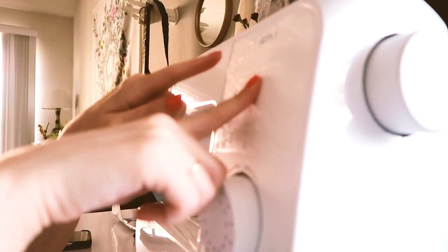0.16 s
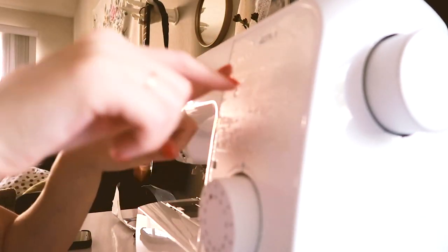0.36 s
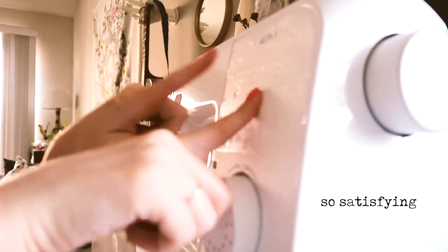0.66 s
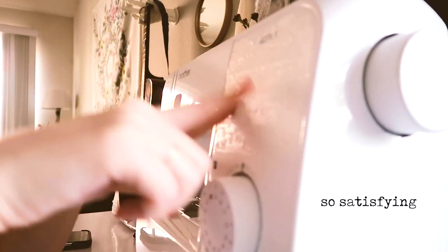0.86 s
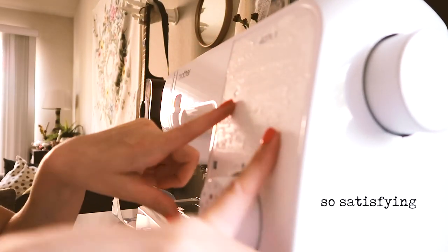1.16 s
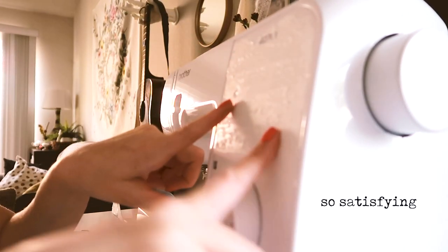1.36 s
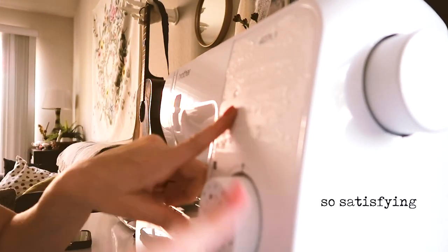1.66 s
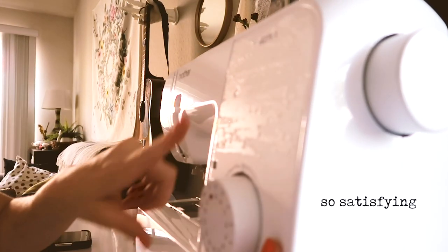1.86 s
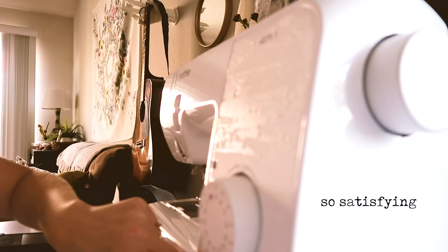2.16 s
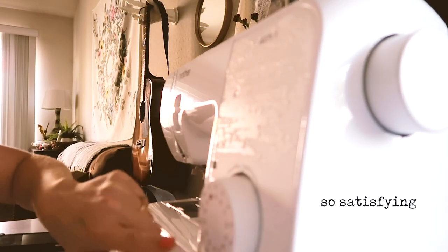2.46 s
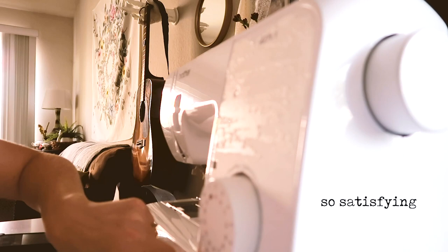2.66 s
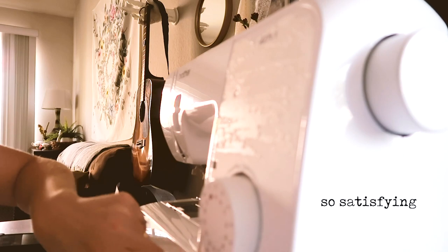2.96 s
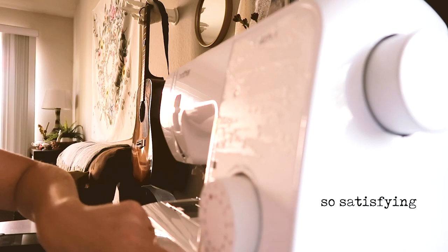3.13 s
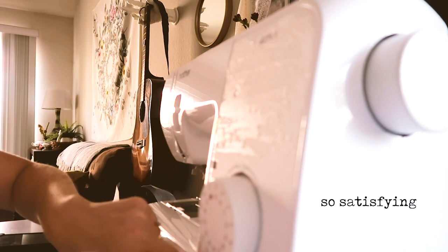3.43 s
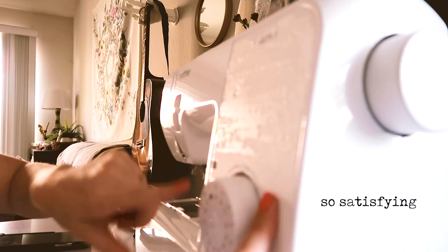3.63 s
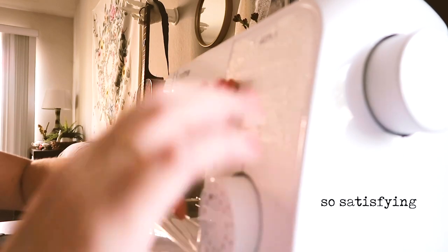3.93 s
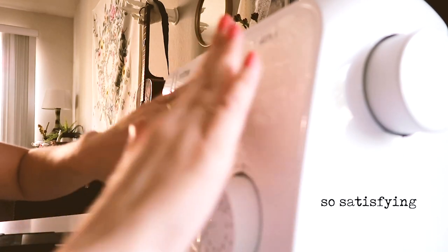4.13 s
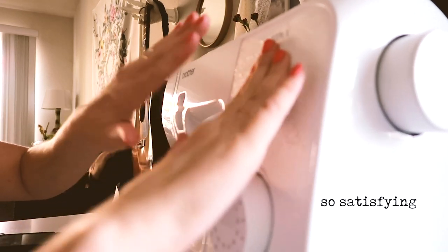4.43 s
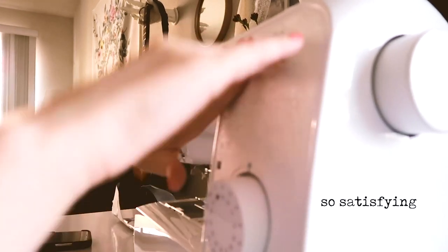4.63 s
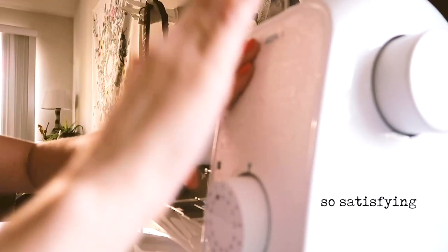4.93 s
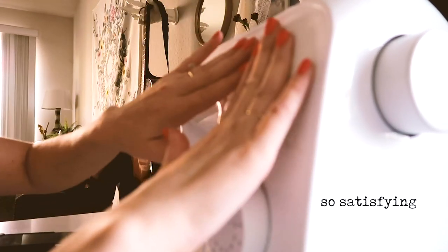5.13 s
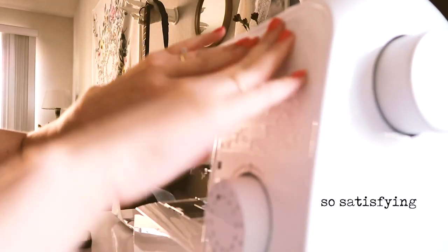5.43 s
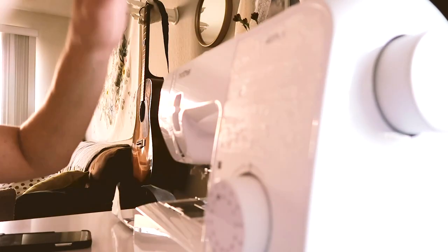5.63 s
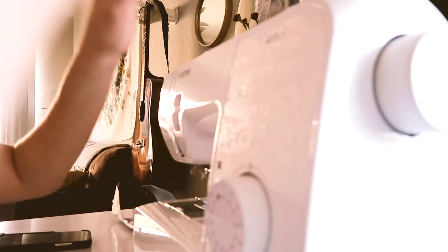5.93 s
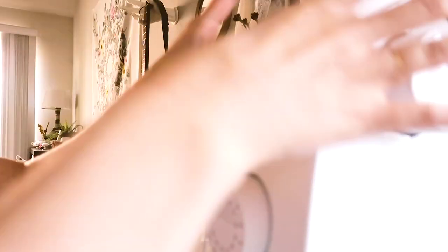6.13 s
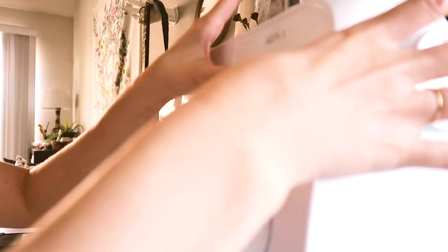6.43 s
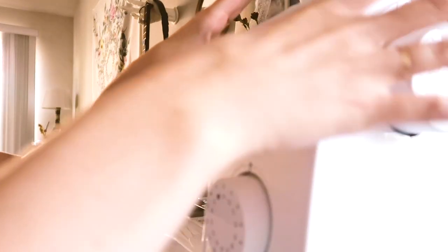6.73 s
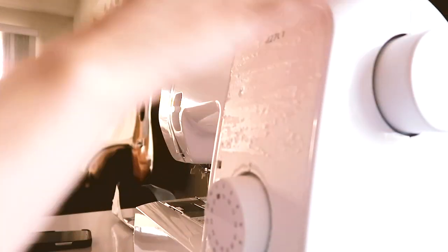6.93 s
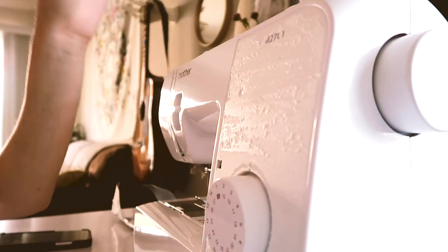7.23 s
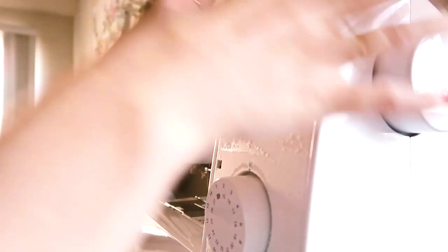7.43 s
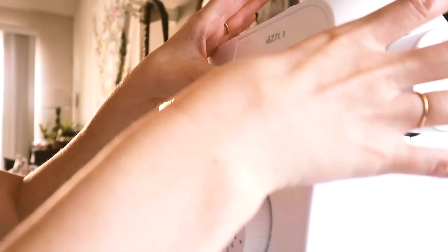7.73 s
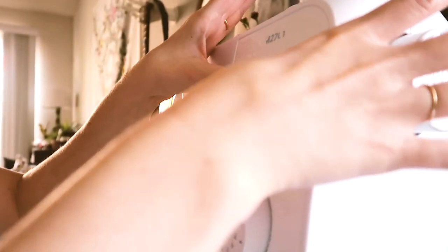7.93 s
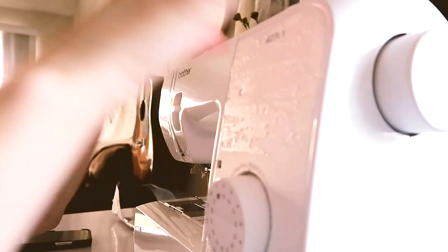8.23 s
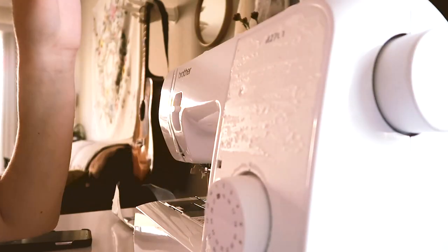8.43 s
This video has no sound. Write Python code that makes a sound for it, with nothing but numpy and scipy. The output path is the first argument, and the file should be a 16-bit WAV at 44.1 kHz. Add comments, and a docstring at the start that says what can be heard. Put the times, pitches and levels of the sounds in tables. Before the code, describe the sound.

Very close to the microphone, fingertips tack onto sticky glue on a thin hollow plastic machine casing and pull free. Each release gives a brief crackle, then a dull boxy pop with a crisp snap. Deeper pops follow in the middle, then flurries of hand slaps with a heavy rumble, then sparse sticky peels. Small furnished room, soft low hum, short echo.

```python
"""In a small furnished room with a faint hum, fingertips press onto tacky glue on the hollow plastic casing
of a sewing machine and pull off again, close to the microphone; later whole hands slap and peel.
Pulls crackle as random streams of breaking glue threads, then pop with a damped panel boom and noise bursts.
Casing modes colour the touches, gliding sines make squeaks and soft ringing tones, and filtered noise makes
rumbles and room air."""
import sys
import numpy as np
from scipy import signal
from scipy.fft import rfft, irfft
from scipy.io import wavfile
from scipy.ndimage import uniform_filter1d

SR = 44100
rng = np.random.default_rng(int(sys.argv[2]) if len(sys.argv) > 2 else 0)


def unload_audio(sound):
    """Save the sound as a 16-bit wav file, at the path given as the first command line argument."""
    columns = np.transpose(np.atleast_2d(sound))
    # keep every value between -1 and 1, then stretch to whole-number steps
    steps = np.round(np.clip(columns, -1, 1) * 32767)
    wavfile.write(sys.argv[1], SR, steps.astype(np.int16))


N = 378378


def amp(db):
    """Decibels to gain."""
    return 10 ** (np.asarray(db) / 20)


def read(points, hz):
    """Reads a frequency table on a log-frequency axis."""
    f, value = np.transpose(points)
    return np.interp(np.log(hz + 1), np.log(f + 1), value)


def evened(x, size=None):
    """Scales to rms 1 over the first size samples."""
    return x / np.sqrt(np.mean(x[:size] ** 2) + 1e-20)


def steady(x):
    """Holds the running rms near 1 and leaves the fine grain."""
    return x / np.sqrt(abs(uniform_filter1d(x ** 2, size=1100)) + 1e-9)


def add(mix, s, sound):
    """Mixes a sound in at time s."""
    part = mix[max(round(s * SR), 0):][:len(sound)]
    part += sound[:len(part)]


def colour(points, size=1024):
    """Causal (minimum-phase) impulse response with the given spectrum."""
    log_gain = np.log(amp(read(points, abs(np.fft.fftfreq(size, 1 / SR)))))
    return np.fft.ifft(np.exp(np.conj(signal.hilbert(log_gain)))).real[:size // 2]


def through(x, response):
    """Convolves and keeps the length."""
    return signal.fftconvolve(x, response)[:len(x)]


def resonate(x, bands):
    """Sums resonances given as (frequency [Hz], width [Hz], level [dB])."""
    return sum(amp(db) * signal.lfilter(*signal.iirpeak(hz, hz / width, fs=SR), x) for hz, width, db in bands)


def even_noise(size):
    """Noise with a flat spectrum and random phase."""
    return irfft(np.exp(2j * np.pi * rng.random(size // 2 + 1)), size) * np.sqrt(size)


def background(air_db=-53, waver=0.43):
    """Room air as shaped noise, with a phase-wavering mains hum and a thin electronic whine."""
    # spectrum of the air in the room: (frequency [Hz], relative level [dB])
    air_spectrum = [(10, -31), (24, 2.5), (45, -5), (70, -10), (95, -10.5), (150, -13), (250, -13),
                    (400, -16), (550, -23), (800, -26.5), (1900, -31.5), (3000, -35), (7000, -44.5),
                    (12500, -55), (15500, -101)]
    # hum and whine: (frequency [Hz], rms level before the gain over time [dB])
    hum_tones = [(59.5, -71.5), (118.6, -60), (209.9, -64), (247.6, -62.5), (13006, -88)]
    # gain of the whole background: (time [s], level [dB])
    air_gain = [(0, 7), (2.6, 6), (2.9, 1), (3.85, 3), (4.3, 7), (8.58, 6)]
    hz, t = np.fft.rfftfreq(N, 1 / SR), np.arange(N) / SR
    mid, side = rfft(rng.standard_normal((2, N))) * amp(read(air_spectrum, hz))
    # the two channels share the low air noise more than the high
    side = side * amp(read([(60, -26.0), (300, -6.5), (1000, -3.0), (3000, -1), (8000, 2.0)], hz))
    mid, side = irfft(np.array([mid, side]), N)
    air = amp(air_db) * np.array([mid + side, mid - side]) / mid.std()
    knots = np.linspace(0, t[-1], 60)
    hum = np.zeros(N)
    for f, db in hum_tones:
        drift = waver * np.interp(t, knots, rng.standard_normal(len(knots)))  # radians
        hum += amp(db) * np.sqrt(2) * np.sin(2 * np.pi * f * t + drift)
    return (air + hum) * amp(np.interp(t, *np.transpose(air_gain)))


def ringing(t, high, spread_db=0., detune=0.):
    """Low modes of the whole shell, or high modes of the walls; share and pitch can vary from touch to touch."""
    # modes of the casing: (frequency [Hz], relative level [dB], t60 [s])
    casing_modes = [(142, -9.5, 0.32), (160, -9.5, 0.32), (221.2, -4.5, 0.23), (264.3, -16.5, 0.26),
                    (305, -0.5, 0.21), (400, -6.5, 0.24), (472.5, -4, 0.12), (522, -8, 0.15),
                    (573, -10.5, 0.068), (718, -19.5, 0.093), (868, -10, 0.14), (1026.4, -7.5, 0.11),
                    (1241.4, -7.5, 0.096), (1383, -7.5, 0.11), (1556, -6.5, 0.092), (1743, -9, 0.046),
                    (2172, -1.5, 0.061), (2418, -1, 0.045), (2700, 3, 0.016), (3497, 4.5, 0.023),
                    (4240, 2, 0.018)]
    out = np.zeros(len(t))
    for hz, db, t60 in casing_modes:
        if (hz > 550) == high:
            sign = rng.choice([-1, 1]) if high else 1
            share, shift = rng.standard_normal(2)
            level = amp(db + spread_db * share - 60 * t / t60)
            out += sign * level * np.sin(2 * np.pi * hz * (1 + detune * shift) * t)
    return out


def walls(t, contact, scatter_db=-19.5, scatter_t60=0.14, modes_db=-13.5, swell=0.089):
    """A short ragged contact, the dense ring of the thin plastic and its stronger modes."""
    burst = even_noise(len(t)) * (np.exp(-t / contact) + amp(scatter_db - 60 * t / scatter_t60))
    modes = evened(ringing(t, True, spread_db=2.5, detune=0.03), size=512)
    ring = evened(burst, size=512) + amp(modes_db) * modes
    return ring * (1 - np.exp(-t / (swell * contact)))


def pops(rise=0.0019, shell_db=-10.5, cancel_hz=167.0, lead_db=-12.0, lead=0.0049,
         sag=0.084, sag_time=0.016, crisp_hz=6560.0, crisp_gain=1.0):
    """The panel springs back with a damped boom and its overtone; the parting skin makes the clack and the snap."""
    # touches and releases: (time [s], boom [dB], clack [dB], snap [dB], middle boom pitch [Hz],
    # contact decay constant [s], boom t60 [s], middle overtone pitch [Hz], overtone [dB])
    touches = [(0.0518, -32, -49.5, -47, 355, 0.0051, 0.055, 666, -55),
               (0.4195, -13, -18, -20.5, 363, 0.0036, 0.071, 528, -24.5),
               (0.59, -30.5, -68, -70, 326, 0.0045, 0.064, 490, -57),
               (0.723, -13, -20.5, -22.5, 361, 0.0041, 0.05, 511, -23.5),
               (0.9896, -12, -18, -25, 346, 0.0062, 0.081, 510, -28),
               (1.354, -13, -27.5, -36, 332, 0.012, 0.039, 590, -27),
               (1.486, -38.5, -43.5, -40, 353, 0.011, 0.093, 600, -50),
               (1.533, -31, -31, -27, 343, 0.0046, 0.054, 586, -42),
               (1.5392, -19, -31.5, -34, 347, 0.0012, 0.057, 762, -35),
               (1.5545, -19.5, -30, -29, 327, 0.0015, 0.064, 624, -29.5),
               (1.878, -19, -20, -29.5, 338, 0.0027, 0.059, 630, -31),
               (2.2037, -10.5, -22.5, -38.5, 331, 0.0052, 0.06, 582, -27.5),
               (2.5116, -13.5, -24, -29.5, 337, 0.007, 0.049, 701, -24.5),
               (2.738, -6.5, -38, -58, 335, 0.0048, 0.096, 463, -30),
               (2.7507, -20, -21, -27.5, 327, 0.0019, .04, 500, -31),
               (2.7522, -8.5, -27.5, -27, 339, 0.0026, 0.043, 437, -34),
               (2.9664, -20.5, -32, -35, 333, 0.0063, 0.05, 722, -33.5),
               (3.1744, -8.5, -28, -29, 347, 0.0029, 0.056, 500, -40),
               (3.319, -28, -51.5, -60, 346, .019, 0.065, 505, -44.5),
               (3.497, -7.5, -21, -31.5, 343, 0.0026, 0.056, 487, -24.5),
               (3.6374, -16, -38, -44.5, 339, 0.00078, .055, 714, -36),
               (3.9724, -37, -41.5, -36.5, 383, 0.0064, 0.14, 636, -48),
               (4.053, -33, -50, -55, 341, 0.0087, 0.064, 610, -48),
               (4.333, -20, -28.5, -35, 355, 0.016, 0.05, 423, -31),
               (4.354, -21.5, -31, -54, 333, .012, 0.094, 590, -33),
               (4.368, -21, -50, -38.5, 341, 0.0048, 0.061, 548, -33),
               (4.436, -39, -37, -28.5, 370, 0.0033, 0.051, 600, -38.5),
               (4.667, -15, -27.5, -32, 305, 0.0013, 0.04, 503, -31),
               (4.673, -9.5, -28.5, -27.5, 330.5, 0.02, 0.044, 438, -36),
               (4.7483, -21, -28.5, -39, 384, 0.0072, 0.028, 681, -31),
               (4.8174, -23.5, -27.5, -31, 400, 0.003, 0.056, 615, -41),
               (4.8316, -19.5, -22.5, -22.5, 368, 0.0018, 0.066, 734, -31.5),
               (4.879, -48, -44, -33, 382, 0.0063, 0.076, 617, -44),
               (4.897, -34, -34, -45, 341, 0.0093, 0.077, 670, -43),
               (4.96, -35.5, -35.5, -46.5, 413, 0.0002, 0.04, 716, -54),
               (5.162, -18, -32.5, -35.5, 352, 0.0054, 0.072, 543, -29.5),
               (5.264, -51, -61, -46.5, 355, 0.00099, 0.051, 610, -51),
               (5.3, -22.5, -35, -38, 347, 0.017, 0.037, 800, -36.5),
               (5.316, -55, -37, -32, 377, 0.0015, .06, 598, -40),
               (5.491, -46, -50, -41, 373, 0.0015, .06, 595, -60),
               (5.5463, -29, -30.5, -37, 351, .001, 0.13, 770, -49),
               (5.609, -22, -48, -32, 360, 0.026, 0.082, 580, -30),
               (5.636, -40, -33, -27, 366, 0.0012, 0.07, 600, -37),
               (5.651, -22, -29.5, -27, 340, 0.0041, 0.048, 600, -53),
               (6.267, -28.5, -39, -44.5, 400, 0.014, 0.1, 629, -37),
               (6.286, -27.5, -41, -45.5, 347, .0077, 0.057, 756, -44),
               (6.906, -36, -37.5, -41, 384, 0.0022, 0.054, 484, -51),
               (7.029, -13.5, -19.5, -28.5, 355, 0.012, 0.074, 552, -23),
               (7.6095, -29, -36.5, -40.5, 380, 0.0032, 0.091, 684, -45),
               (7.641, -39, -34, -41, 320, 0.0077, 0.13, 647, -43),
               (7.654, -31, -52, -53, 285, 0.0055, 0.03, 575, -43),
               (8.295, -19.5, -25, -28.5, 398, 0.015, 0.029, 520, -31),
               (8.3139, -16, -24, -27.5, 348, 0.0074, 0.042, 575, -26)]
    # spectra of the clack and the snap: (frequency [Hz], relative level [dB])
    clack_spectrum = [(100, -50.5), (300, 3), (550, 6.5), (850, -0.5), (1250, 2), (2000, -10),
                      (3000, -46.5), (16000, -40)]
    snap_spectrum = [(300, -56.5), (1200, -1), (2200, 5.5), (3000, 1), (4000, -3.5), (5200, -10.5),
                     (10000, -17), (13500, -29), (16000, -35)]
    overtone_t60 = 0.089  # s, the panel's second mode
    out, t = np.zeros(N), np.arange(8192) / SR
    clack, snap = colour(clack_spectrum), colour(snap_spectrum)
    shell = amp(shell_db) * evened(ringing(t, False), size=512)
    radiation = signal.butter(2, cancel_hz, "high", fs=SR, output="sos")  # a small panel gives off little deep bass
    bent = np.cumsum(1 + sag * (np.exp(-t / sag_time) - .5)) / SR  # the pitch sinks as the strain leaves the panel
    for s, boom_db, clack_db, snap_db, hz, contact, t60, overtone_hz, overtone_db in touches:
        panel = evened(amp(-60 * t / t60) * np.sin(2 * np.pi * hz * bent), size=512)
        boom = signal.sosfilt(radiation, (panel + shell) * (1 - np.exp(-(t / rise) ** 2)))
        overtone = amp(-60 * t / overtone_t60) * np.sin(2 * np.pi * overtone_hz * bent)
        overtone = overtone * (1 - np.exp(-t / rise))
        # where the snap outweighs the clack the glue parts cleanly and sounds brighter
        edge = min(crisp_hz * amp(crisp_gain * (snap_db - clack_db)), SR * 2 / 5)
        crack = signal.lfilter(*signal.butter(1, edge, fs=SR), snap)
        clack_part = through(walls(t, contact), clack)
        snap_part = through(walls(t, contact), crack)
        parts = (boom_db, boom), (overtone_db, overtone), (clack_db, clack_part), (snap_db, snap_part)
        for db, part in parts:
            add(out, s, amp(db) * evened(part, size=512))
        # the rim of the contact tears with growing force just before the pop
        tearing = evened(through(even_noise(size=1024), crack)) * np.exp(-t[:1024] / lead)[::-1]
        add(out, s - len(tearing) / SR, amp(snap_db + lead_db) * tearing)
    return out


def peels(boom_t60=0.073):
    """Glue threads break in a dense stream, ticking the walls and shaking the panel until the skin lets go."""
    # peels: (start [s], end [s], crackle at the end [dB], boom at the end [dB],
    # swell of the crackle, negative where it fades [dB], panel pitch halfway [Hz])
    pulls = [(0.357, 0.421, -40.5, -21.5, -6, 365), (.682, 0.73, -60, -41, -8.5, 350),
             (0.928, 0.92, -50, -49, 16, 387), (0.961, 0.992, -36, -27.5, -0.5, 400),
             (1.261, 1.29, -49, -46, 1, 352), (1.526, 1.534, -32, -41, 8.5, 352),
             (1.817, 1.893, -45.5, -35, -1.5, 343), (2.438, 2.494, -43, -33, 8, 347),
             (2.634, 2.732, -38, -14.5, 8.5, 332), (2.899, 2.95, -55, -39, 1, 335),
             (3.105, 3.16, -46, -22.5, -2, 334), (3.44, 3.508, -44.5, -20.5, 3, 351),
             (3.95, 3.978, -39, -59, 13, 364), (4.254, 4.362, -35.5, -34.5, 12.5, 340),
             (4.557, 4.667, -42, -37, 4, 370), (4.736, 4.795, -40, -27, -8.5, 360),
             (5.038, 5.175, -49, -44, 0.5, 352), (5.51, 5.603, -31.5, -31, 7, 341),
             (5.632, 5.649, -24.5, -34, 1.5, 350), (6.926, 6.959, -39, -31.5, -1.5, 375),
             (6.995, 7.018, -26.5, -20.5, 2, 357), (7.625, 7.625, -39, -37, 10, 356),
             (8.196, 8.232, -41, -38, -2, 410), (8.255, 8.291, -31, -27.5, 8, 395)]
    # spectrum of the crackle: (frequency [Hz], relative level [dB])
    crackle_spectrum = [(100, -26.5), (300, -2.5), (550, 4.5), (850, 2), (1250, 1.5), (2000, 0),
                        (3000, -4.5), (4000, -10.5), (5200, -15.5), (7500, -21), (10000, -28),
                        (13500, -49.5)]
    # band where the finest threads tick: (low edge [Hz], high edge [Hz])
    sizzle_band = (12000, 15000)
    threads_per_s, thread_spread_db, clump_db = 2700., 3.4, 2.0
    sizzle_db, sizzle_growth = -41.5, 0.69  # sizzle at 0 dB of crackle, and its dB per dB of crackle
    attack_s, release_s, panel_stop_s = 0.014, 0.015, 0.13  # the glue gives way quickly; the last threads trail off
    spot_s = .012  # time the edge of the contact takes to cross one spot of the wall
    strain_db_per_s = 178  # the panel shakes harder and harder as the pull bends it
    sag_per_s = 1  # share by which the panel's pitch sinks in a second as the skin comes away
    out, t = np.zeros(N), np.arange(4096) / SR
    tone = colour(crackle_spectrum)
    radiation = signal.butter(1, [220, 520], "band", fs=SR, output="sos")
    top = signal.butter(2, sizzle_band, "band", fs=SR, output="sos")
    for start, end, crackle_db, boom_db, swell_db, hz in pulls:
        count = SR * 2 // 5
        time = start - .1 + np.arange(count) / SR
        clumps = evened(uniform_filter1d(rng.standard_normal(count), size=160))
        spread = thread_spread_db * np.minimum(rng.exponential(1, count), 4)
        sizes = amp(spread + clump_db * np.minimum(clumps, 1))
        breaks = (rng.random(count) < threads_per_s / SR) * sizes * rng.choice([-1, 1], count)
        before, after = np.maximum(start - time, 0), np.maximum(time - end, 0)
        ends = np.exp(-before / attack_s - after / release_s)
        stuck = np.interp(time, [start, end], [1, 0])  # share of the skin that still sticks
        # the edge of the contact travels, so the ticks ring one spot of the wall after another
        spot = (time / spot_s + rng.random(count)).astype(int) % 5
        ticks = np.zeros(count)
        for k in np.unique(spot):
            ticks += through(breaks * (spot == k), walls(t, .0008, scatter_db=-18., modes_db=-11.))
        sizzle = amp(sizzle_db + sizzle_growth * crackle_db) * steady(signal.sosfilt(top, breaks))
        crackle = amp(crackle_db) * steady(through(ticks, tone)) + sizzle
        # a damped resonance whose pitch glides with the turning phase
        pitch = hz * (1 - sag_per_s * (time - (start + end) / 2))
        turn = np.exp(2j * np.pi * np.cumsum(pitch) / SR)
        panel = (turn * through(breaks / turn, amp(-60 * t / boom_t60))).real
        boom = steady(signal.sosfilt(radiation, panel))
        boom = boom * np.exp(-(after / panel_stop_s) ** 2)  # the panel stops shaking once it is let go
        slack_db = strain_db_per_s * (end - start) * stuck
        add(out, time[0], ends * (crackle * amp(-swell_db * stuck) + boom * amp(boom_db - slack_db)))
    return out


def short_glides(jitter=0.09):
    """Short, unsteady gliding tones: squeaks of skin on glue, a ridge ringing in a crackle and a soft ringing tick."""
    # gliding tones: (time [s], length [s], first pitch [Hz], last pitch [Hz], peak level [dB])
    glides = [(.358, 0.0394, 1397, 1630, -33), (.778, 0.018, 1450, 1370, -32),
              (1.5235, .009, 2000, 3760, -33), (1.531, 0.014, 4300, 3950, -34),
              (1.538, .016, 2150, 1900, -28), (7.029, 0.0039, 3170, 5000, -27.5)]
    out = np.zeros(N)
    for s, length, first_hz, last_hz, db in glides:
        part = np.arange(0, 1, 1 / (length * SR))
        pitch = first_hz + (last_hz - first_hz) * part
        hz = pitch * (1 + jitter * rng.standard_normal(len(part)))
        add(out, s, amp(db) * np.sin(np.pi * part) * np.sin(2 * np.pi * np.cumsum(hz) / SR))
    return out


def shoves(rise=0.0017):
    """Heavy pushes rock the machine on its table: noise through low resonances makes a dull rumble."""
    # pushes: (time [s], level before the decay [dB], t60 [s])
    pushes = [(4.333, -33, 0.42), (4.672, -18.5, 0.44), (4.713, -26, 0.2), (6.75, -37, 0.49),
              (7.039, -39, 0.25), (8.322, -32, 0.27)]
    # the machine on its table: (frequency [Hz], width [Hz], relative level [dB])
    rocking_modes = [(61.6, 15.5, -0.5), (134.5, 11.4, 1)]
    out, t = np.zeros(N), np.arange(SR // 2) / SR
    dull = signal.butter(2, 250, "low", fs=SR, output="sos")
    for s, db, t60 in pushes:
        rumble = signal.sosfilt(dull, resonate(even_noise(len(t)), rocking_modes))
        add(out, s, evened(rumble) * amp(db - 60 * t / t60) * (1 - np.exp(-t / rise)))
    return out


def base(x):
    """What the stiff base adds to a touch: it rings in some bands and swallows others."""
    # resonances of the lower casing: (frequency [Hz], width [Hz], level [dB])
    rung_bands = [(1715, 120, -3), (2895, 140, 12), (3420, 130, 1), (4010, 230, 6.5), (6750, 600, -6)]
    # bands the base takes away: (frequency [Hz], width [Hz], share taken [dB])
    muted_bands = [(151, 210, -2.5), (630, 97, -8), (995, 270, -6), (1440, 190, -14), (1860, 130, -25),
                   (2850, 390, -3.5), (3300, 220, 2.5), (4280, 270, -4)]
    return resonate(x, rung_bands) - resonate(x, muted_bands)


def room(x, wet_db=-14.0, side_db=-42.0, build=0.00092):
    """A few near echoes and a short tail of sparse taps, each band dying at its own speed."""
    # decay of the room: (frequency [Hz], t60 [s])
    room_decay = [(100, 0.079), (300, 0.31), (700, 0.45), (2300, 0.31), (5000, 0.3), (15000, 0.15)]
    # nearby surfaces: (delay [s], gain [ratio])
    near_echoes = [(0.0178, 0.032), (0.027, 0.056)]
    size = SR // 2
    taps = rng.choice([-1., 1.], (2, size)) * (rng.random((2, size)) < .1)
    taps = taps * (1 - np.exp(-np.arange(size) / SR / build))
    hz, t, z = signal.stft(taps, SR, nperseg=256)
    tails = signal.istft(z * amp(-60 * t / read(room_decay, hz)[:, None]), SR, nperseg=256)[1]
    mid, side = (amp(wet_db) * through(x, tail / np.linalg.norm(tail)) for tail in tails)
    # the two ports share the long waves of the tail but not the short ones
    side = amp(side_db) * side + signal.lfilter(*signal.butter(1, 3500, "high", fs=SR), side)
    for delay, gain in near_echoes:
        add(mid, delay, gain * x)
    return x + mid, side


def ports(mid, side):
    """Two microphone ports: the left hears later and a little less, and the treble reaches each by different paths."""
    # lag of the left port behind the right: (frequency [Hz], phase [rad])
    lag = [(0, 0), (150, .03), (350, .08), (1500, .15), (3400, .4), (5500, 1.1), (7500, 1.8), (9200, 2.6),
           (11000, 2.7), (13000, 1.7), (15500, 1.2)]
    # random phase between the ports: (frequency [Hz], rms scatter [rad])
    scatter = [(60, .01), (300, 0.16), (1000, 0.071), (2500, 0.083), (5000, 0.2), (9000, 0.11)]
    hz = np.fft.rfftfreq(N, 1 / SR)
    paths = evened(rfft(rng.standard_normal(300), N).real)
    turn = np.exp(.5j * (read(lag, hz) + paths * read(scatter, hz)))  # half the phase on each port
    m, s = rfft(mid), rfft(side)
    return irfft(np.array([(m + s) / turn, (m - s) * turn]), N) * amp([[-.2], [.2]])


def scene(spill=0.35, nearness=0.34):
    """Hands on the casing in the room; touches on the base, right by the microphone, take its colour and sound drier."""
    # touches that fall on the base: (time [s], share [0-1])
    base_share = [(2.57, 0), (2.62, 1), (2.88, 1), (2.92, 0), (3.05, 0), (3.09, 1), (3.6, 1), (3.85, 0)]
    hands = pops() + peels() + short_glides()
    low = hands * np.interp(np.arange(N) / SR, *np.transpose(base_share))
    coloured = base(low)
    near = nearness * low + (1 - spill) * coloured  # the part that reaches the microphone without the room
    mid, side = room(hands + coloured - near + shoves())
    return background() + ports(mid + near, side)


def record(dry, ceiling=.9, edge_hz=15900):
    """The microphone's bass roll-off, a soft overload near the ceiling and the recorder's band limit."""
    dry = signal.sosfilt(signal.butter(1, 42, "high", fs=SR, output="sos"), dry)
    dry = dry / (1 + (dry / ceiling) ** 10) ** (1 / 10)
    return signal.oaconvolve(dry, signal.firwin(511, edge_hz, window=("kaiser", 9), fs=SR)[None], "same")


dry = scene()
out = record(dry)
unload_audio(out)
```